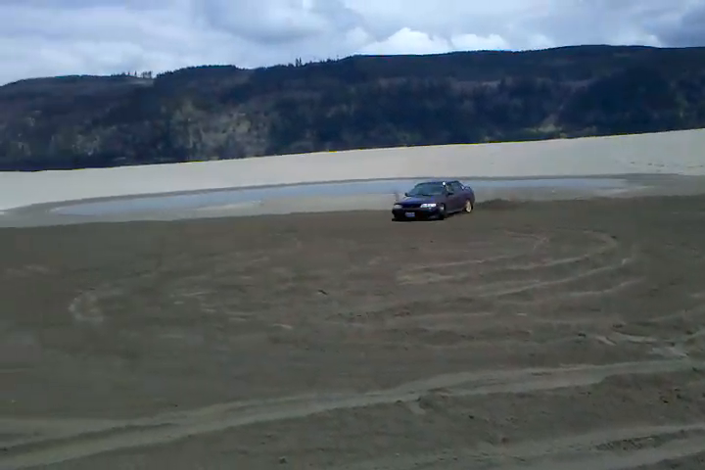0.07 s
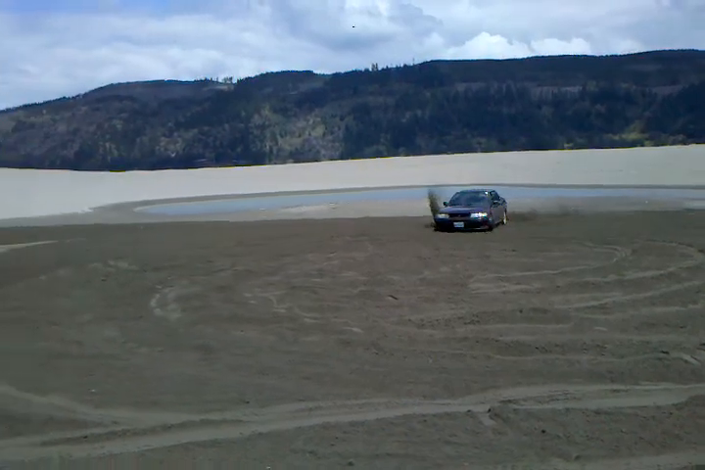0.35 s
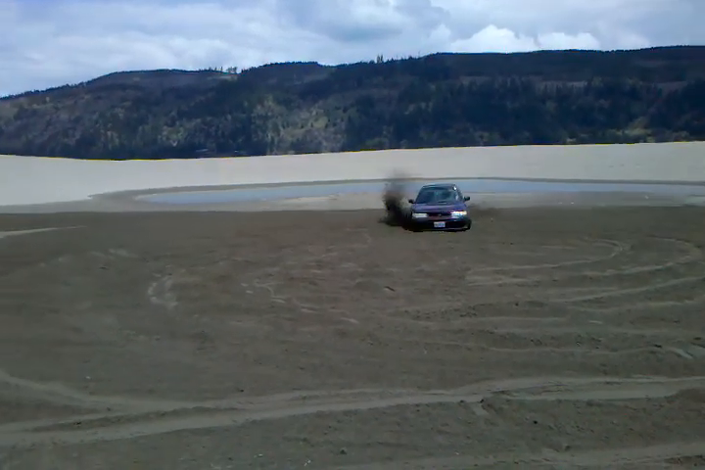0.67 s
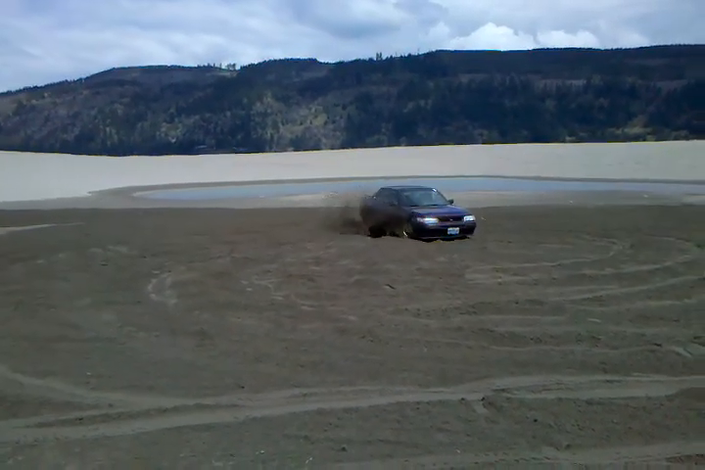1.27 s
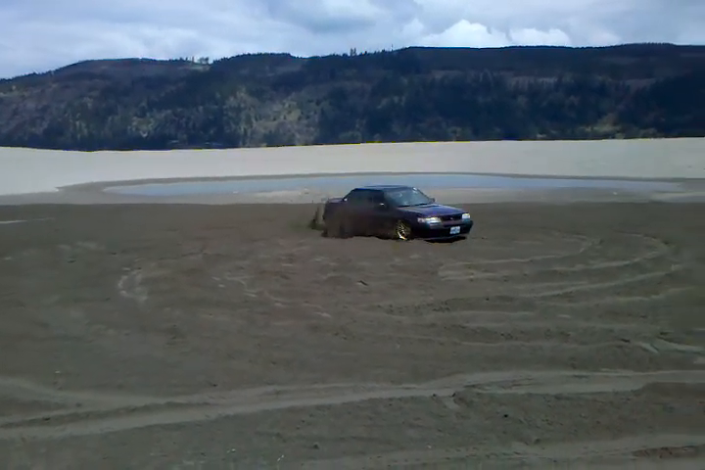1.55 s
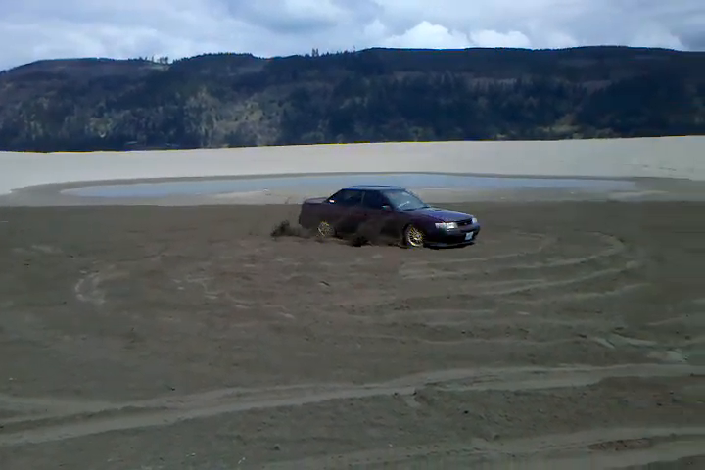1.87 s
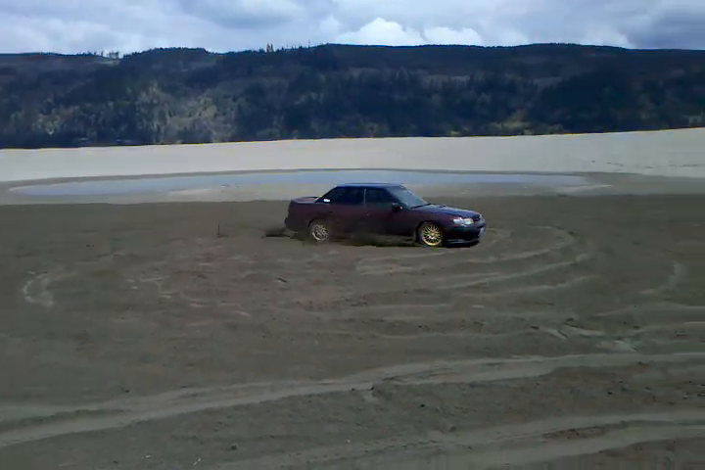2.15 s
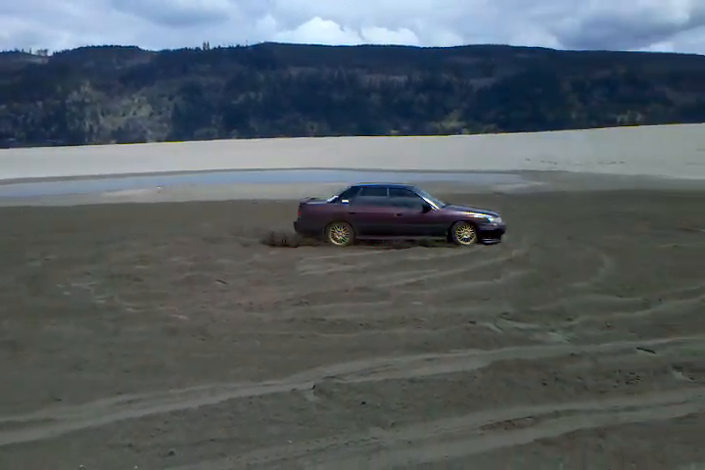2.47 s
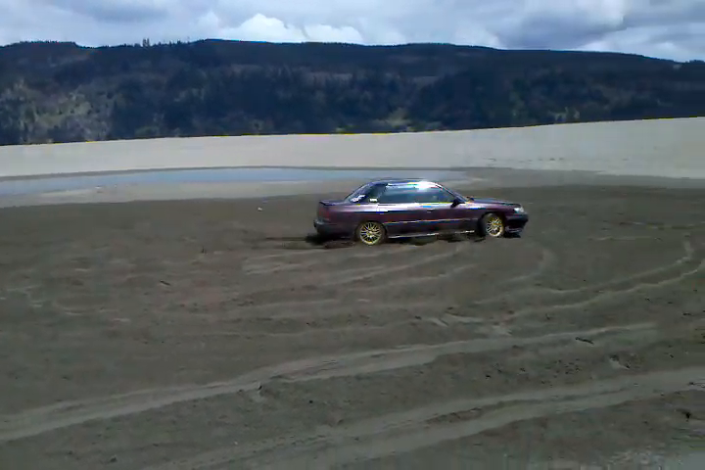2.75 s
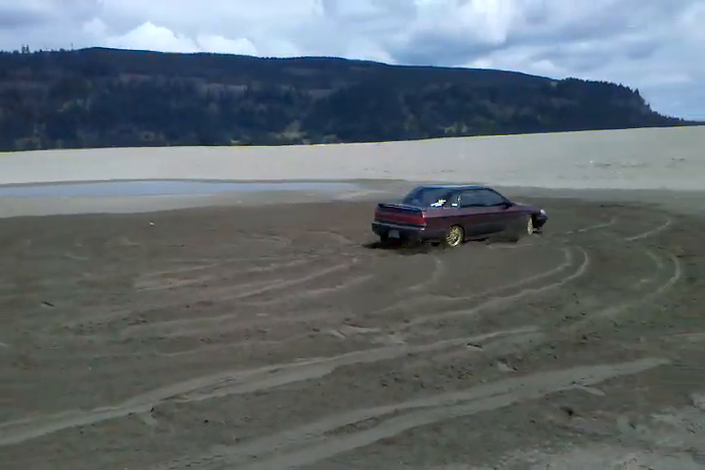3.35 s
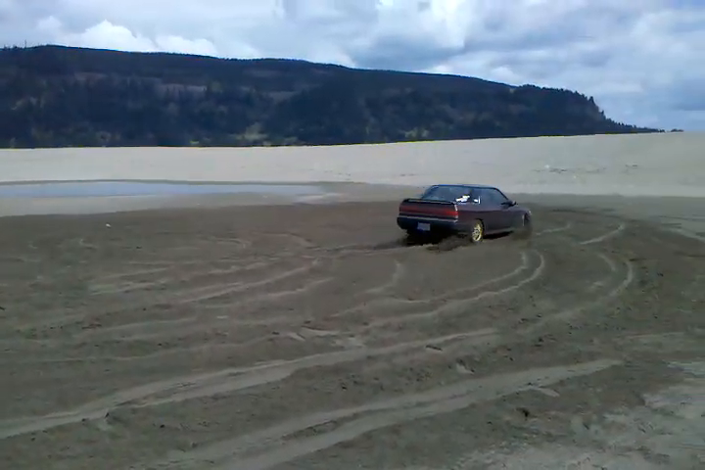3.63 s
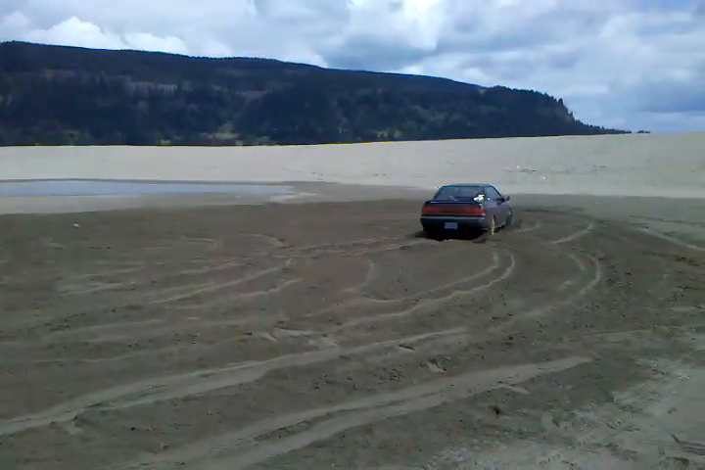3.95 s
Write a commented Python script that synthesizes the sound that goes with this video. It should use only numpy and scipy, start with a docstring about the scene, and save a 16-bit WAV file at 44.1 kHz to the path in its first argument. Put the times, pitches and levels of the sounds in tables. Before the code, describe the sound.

A turbocharged car revs in surges across open ground, tyres throwing sand throughout. The turbo whistles up and vents with hooting hisses as the throttle lifts; then the tailpipe swings toward the stereo microphone, barking and popping as revs fall.

```python
"""A turbocharged flat-four car slides in a circle on loose dirt, some way off in the open.
The tyres spray grit throughout. The turbo whistles up, the driver lifts and the blow-off valve vents.
The revs sag, then the uneven exhaust beat swells with the throttle, broken by a short puff of the valve.
At 2.5 s the tailpipe swings toward a small stereo microphone with a widening circuit and the exhaust barks.
The valve vents again, the bass spreads wide and the exhaust pops on the overrun."""
import sys
import numpy as np
from scipy import signal
from scipy.fft import rfft, irfft, next_fast_len
from scipy.io import wavfile

SR = 44100
rng = np.random.default_rng(int(sys.argv[2]) if len(sys.argv) > 2 else 0)


def unload_audio(sound):
    """Save the sound as a 16-bit wav file, at the path given as the first command line argument."""
    columns = np.transpose(np.atleast_2d(sound))
    # keep every value between -1 and 1, then stretch to whole-number steps
    steps = np.round(np.clip(columns, -1, 1) * 32767)
    wavfile.write(sys.argv[1], SR, steps.astype(np.int16))


N = 176400
T = np.arange(N) / SR
SIZE = next_fast_len(N + SR // 4)
HZ = np.maximum(np.arange(SIZE // 2 + 1) * SR / SIZE, 1)

# accents of the four firings in one engine cycle: level/dB
FIRING_DB = [-4.5, -12, -6.5, -2]
# colour of rushing gas, in the valve and the pops: f/Hz, level/dB
GAS_RUSH_EQ = [(500,-80),(800,10),(1150,11.5),(1400,-3),(1700,12),(2600,-5),(3400,-12.5),(6000,-32.5)]


def exhaust_tone(speed, cycles):
    """The engine's low orders swell and fade as they slide through the pipe's resonances."""
    orders = [(4,-5.5),(5,-1),(6,-23.5),(7,4.5),(8,1.5),(9,1),(11,-0.5)]  # balance of the orders: multiple of the cycle rate, level/dB
    pipe_eq = [(150,-1),(195,3.5),(232,-10),(268,4),(300,-1),(345,1.5),(400,-10),(520,-35),(640,-6)]  # response of the exhaust pipe: f/Hz, level/dB
    fader = [(0,-27.5),(.08,-47),(.18,-31),(.44,-26.5),(.52,-64),(.88,-43),(1.0,-28.5),(1.48,-30),(1.62,-22),(1.85,-22),(2.09,-25.5),(2.16,-35),(2.33,-22),(2.68,-23),(2.86,-44),(3.08,-37.5),(3.42,-26),(3.72,-29.5),(4,-39.5)]  # the tone follows the throttle: t/s, level/dB
    resonance_hz, resonance_width_hz, pipe_delay_s = 279.3, 12, 0.00066
    drone_db, drone_width_hz, waver_db = 8, 26, 2.37
    pipe_hz, pipe_db = np.transpose(pipe_eq)
    wave, power = 0, 0
    for k, db in orders:
        k = round(k)
        hz = k * speed
        if k == 2 * len(FIRING_DB):  # twice the firing rate drones when it meets the resonance
            db = db + drone_db / (1 + ((hz - resonance_hz) / drone_width_hz) ** 8)
        gain = amp(db + np.interp(hz, pipe_hz, pipe_db))
        # the main resonance twists the phase and smears the beat
        twist = 1.32 * np.arctan((hz - resonance_hz) / resonance_width_hz)
        phase = 2 * np.pi * k * (cycles - speed * pipe_delay_s) - twist
        wave = wave + gain * amp(waver_db * drift(3.4)) * np.cos(phase)
        power = power + gain ** 2 / 2
    return envelope(fader) * wave / np.sqrt(power)


def exhaust_pulses(cycles):
    """Two strong and two weak firings a cycle, each a pressure step with a puff of gas."""
    rumble_fader = [(0,-34.5),(1.1,-38.5),(1.7,-32.5),(2.9,-31.5),(3.65,-34),(4,-31)]  # rough low end: t/s, level/dB
    rumble_eq = [(40,-42.5),(70,-22.5),(110,-3),(170,1.5),(480,-7.5),(900,-55)]  # its dull thud: f/Hz, level/dB
    bark_fader = [(0,-43),(.4,-33.5),(.55,-46.5),(1.3,-42),(1.6,-32.5),(2.2,-43.5),(2.58,-24.5),(2.85,-40.5),(3.4,-32),(3.7,-33),(4,-46.5)]  # the tailpipe's bark: t/s, level/dB
    bark_eq = [(200,-41.5),(330,12.5),(410,5),(640,-0.5),(900,-7),(1150,-9.5),(1400,-39),(3000,-63.5)]  # its throaty low mids: f/Hz, level/dB
    crack_fader = [(0,-43),(.9,-56),(1.5,-51.5),(2.42,-57),(2.5,-35.5),(2.66,-36),(2.8,-76),(3.2,-54),(3.35,-39),(3.72,-46.5),(3.87,-56)]  # sharp edge of the firings: t/s, level/dB
    crack_eq = [(80,-34),(400,27),(1150,-42),(1400,-4.5),(1900,12),(3300,-6.5),(5000,-16),(9000,-51)]  # its knock and bite: f/Hz, level/dB
    spread_db, jitter_s, puff_s, ragged_from_s = 2.5, .00007, 0.0026, 2.521
    firings = np.flatnonzero(np.diff(np.floor(len(FIRING_DB) * cycles)))
    level_chance, time_chance = rng.standard_normal((800, 2))[:len(firings)].T
    db = np.resize(np.roll(FIRING_DB, -1), len(firings)) + spread_db * level_chance
    onsets = firings + (jitter_s * SR * time_chance).astype(int)
    clicks = np.zeros(N)
    clicks[np.clip(onsets, 0, N - 1)] = amp(db)
    puffs = unit(dying(clicks, puff_s) * noise())
    pulses = unit(clicks) + 0.55 * puffs
    rumble = envelope(rumble_fader) * colour(pulses + 1.58 * noise(), rumble_eq)
    # the bark turns from clean to ragged going into the overrun
    ragged = 0.63 + np.clip((T - ragged_from_s) / 0.19, 0, 1)
    bark = envelope(bark_fader) * colour(unit(clicks) + ragged * puffs, bark_eq)
    crack = envelope(crack_fader) * colour(pulses, crack_eq)
    return rumble + bark + crack


def exhaust_song(speed, cycles):
    """Under load the upper orders stand out as clean lines, each loudest where it meets a resonance."""
    fader = [(.1,-46),(.42,-44),(.55,-84),(1.6,-50),(2.05,-40),(2.17,-45.5),(2.55,-31.5),(2.7,-36),(2.9,-62)]  # singing upper orders: t/s, level/dB
    resonances = [(415,-3),(510,-0.5),(640,5),(900,3),(1060,-5.5)]  # peaks they slide through: f/Hz, level/dB
    width_hz = 61
    wave, power = 0, 0
    for k in range(11, 33):
        gain = sum(amp(db) / (1 + (2 * (k * speed - hz) / width_hz) ** 2) for hz, db in resonances)
        wave = wave + gain * np.cos(2 * np.pi * (k * cycles + rng.random()))
        power = power + gain ** 2 / 2
    return envelope(fader) * wave / np.sqrt(power)


def overrun_pops():
    """Short bursts of gas in the tailpipe: a thump, some with a hard crack on top."""
    pops = [(2.982,-31,-60),(3.008,-29.5,-56),(3.124,-29,-46),(3.188,-27,-64),(3.234,-22.5,-48),(3.31,-34,-41),(3.349,-35.5,-34.5),(3.389,-30.5,-36.5),(3.694,-26.5,-42)]  # cue list: t/s, thump/dB, crack/dB
    thump_eq = [(50,-49),(200,-2.5),(450,7),(1300,-11),(3500,-55),(9000,-62)]  # body of a pop: f/Hz, level/dB
    clicks = np.zeros((2, N))
    for s, thump_db, crack_db in pops:
        clicks[:, int(s * SR)] += amp([thump_db, crack_db])
    thump, crack = dying(clicks, decay_s=0.0073)
    return thump * colour(noise(), thump_eq) + crack * colour(noise(), GAS_RUSH_EQ)


def blow_off():
    """The valve opens with a hiss; as pressure drains, its hoot steps down the pipe's resonances."""
    # valve openings: t/s, length/s, attack/s, hiss/dB, hiss fade/(dB/s),
    # hoot/dB, hoot f/Hz, hoot and rush fade/(dB/s), rush/dB
    vents = [(-.06,0.13,.015,-29,30,-34,1050,-3,-31),(0.409,0.43,0.058,-25,40,-23.5,1143,28,-31.5),(2.039,.11,0.044,-31.5,-6,-30,1278,34,-37.5),(2.651,0.29,0.097,-32.5,60,-30,1163,68,-37)]
    hiss_eq = [(900,-41.5),(1800,2.5),(2600,6.5),(3400,-7),(4600,2.5),(6000,12),(7200,-6.5),(8400,10),(10000,1.5),(12000,-4.5),(14000,1)]  # bright escaping air: f/Hz, level/dB
    modes = [(830,2),(990,1),(1075,1),(1190,3)]  # resonances of the valve's pipe: f/Hz, level/dB
    release_s, hoot_delay_s, sag_hz_per_s = 0.016, 0.047, 800
    mode_width_hz, jet_width_hz, octave_db, flutter_db = 60, 124, -15, 2.5
    hiss = colour(noise(), hiss_eq)
    rush = colour(noise(), GAS_RUSH_EQ)
    flutter = amp(flutter_db * drift(17))
    tones = []
    for hz, db in modes:
        tone = whistle(hz, mode_width_hz) + amp(octave_db) * whistle(2 * hz, 2 * mode_width_hz)
        tones.append((hz, amp(db) * tone))
    out = 0
    for s, length, attack, hiss_db, hiss_fade, hoot_db, hoot_hz, fade, rush_db in vents:
        age = T - s
        open_s = np.maximum(age - attack, 0)
        jet = amp(hiss_db - hiss_fade * open_s) * hiss + amp(rush_db - fade * open_s) * rush
        jet *= np.clip(age / attack, 0, 1) * flutter ** 0.75
        # the sagging jet excites whichever modes lie nearest
        jet_hz = hoot_hz - sag_hz_per_s * np.clip(age, 0, length)
        hoot = sum(tone / np.hypot(1, 2 * (hz - jet_hz) / jet_width_hz) for hz, tone in tones)
        hoot *= amp(hoot_db - fade * open_s) * flutter / np.sqrt(2)
        hoot *= np.clip((age - hoot_delay_s) / attack, 0, 1)
        closing = np.exp(-np.maximum(age - length, 0) / release_s)
        out = out + closing * (jet + hoot)
    return out


def turbo():
    """The intake roars and the compressor whistles unsteadily as boost builds."""
    intake = [(0,950,-53),(.33,1160,-34.5),(.44,1150,-46),(.6,1000,-104),(1.55,1060,-39.5),(1.85,1140,-36.5),(2.2,1050,-54),(2.42,1100,-29.5),(2.6,1040,-36.5),(2.95,900,-75)]  # roar under boost: t/s, f/Hz, level/dB
    spool = [(.1,11000,-66),(.36,14200,-44),(.5,14000,-65),(.85,5793,-57),(1.08,7280,-72),(1.2,8400,-53.5),(1.6,12360,-54),(1.8,13390,-50.5),(2.06,14400,-43),(2.18,11120,-61.5),(2.41,13530,-49),(2.62,13750,-52.5),(2.78,12990,-64)]  # compressor whistle: t/s, f/Hz, level/dB
    flicker_db, waver_hz = 3, 50
    intake_hz, intake_db = in_time(intake)
    hz, db = in_time(spool)
    compressor = amp(db + flicker_db * drift(22)) * whistle(hz + waver_hz * drift(39), width_hz=560)
    return amp(intake_db) * whistle(intake_hz, width_hz=95) + compressor


def dirt_spray():
    """The tyres throw a wash of sand with grains of grit in it."""
    fader = [(0,-49.5),(.35,-39.5),(.9,-48.5),(1.55,-38),(2.25,-40),(2.85,-39.5),(3.08,-45),(4,-49)]  # surges of dirt: t/s, level/dB
    sand_eq = [(200,-26),(500,8),(1000,13),(1400,0),(1900,3.5),(3600,-13),(5000,-7),(9000,-10),(11500,-17.5),(14000,-14)]  # colour of the spray: f/Hz, level/dB
    grains_per_s, grit_db = 420, -6.5
    grit = (rng.random(N) < grains_per_s / SR) * (2 * rng.random(N) - 1)
    return envelope(fader) * colour(noise() + amp(grit_db) * unit(grit), sand_eq)


def rushing_layers():
    """Turbo, valve and dirt together, from fresh noise at each call."""
    return turbo() + blow_off() + dirt_spray()


def ground_scatter(x, decay_s=0.013):
    """Short diffuse scatter off the ground, with a flat spectrum."""
    response = rfft(noise() * np.exp(-T / decay_s), SIZE)
    return filtered(x, response / (np.abs(response) + 1e-12))


def amp(db):
    """Decibels to gain."""
    return 10 ** (np.asarray(db) / 20)


def unit(x):
    """Scale to rms 1."""
    return x / np.sqrt(np.mean(np.abs(x) ** 2) + 1e-20)


def in_time(rows):
    """Columns of an automation curve at every sample."""
    s, *columns = np.transpose(rows)
    return [np.interp(T, s, c) for c in columns]


def envelope(fader):
    """A fader curve's gain at every sample."""
    return amp(in_time(fader)[0])


def gains(eq):
    """An EQ curve's gain at every frequency."""
    hz, db = np.transpose(eq)
    return amp(np.interp(np.log(HZ), np.log(hz), db))


def filtered(x, response):
    """Apply a frequency response."""
    return irfft(rfft(x, SIZE) * response, SIZE)[..., :N]


def colour(x, eq):
    """Minimum-phase EQ, which keeps attacks sharp; the result has rms 1."""
    cepstrum = irfft(np.log(gains(eq)), SIZE)
    cepstrum[1:SIZE // 2] *= 2
    cepstrum[SIZE // 2 + 1:] = 0
    return unit(filtered(x, np.exp(rfft(cepstrum))))


def noise():
    """White noise."""
    return rng.standard_normal(N)


def drift(rate_hz):
    """Smooth random wander with spread 1, drawn at every 16th sample."""
    s = T[::16]
    hz = np.arange(len(s) // 2 + 1) * SR / N
    spectrum = rfft(rng.standard_normal(len(s))) / np.sqrt(1 + (hz / rate_hz) ** 4)
    return np.interp(T, s, unit(irfft(spectrum, len(s))))


def whistle(hz, width_hz):
    """Turbulence in a narrow resonance with a steady or moving centre."""
    phase = 2 * np.pi * np.cumsum(np.broadcast_to(hz, N)) / SR
    return unit(drift(width_hz / 2) * np.cos(phase) + drift(width_hz / 2) * np.sin(phase))


def dying(clicks, decay_s):
    """Each click starts an exponential decay."""
    return signal.lfilter([1], [1, -np.exp(-1 / (decay_s * SR))], clicks + 1e-18)


def scene():
    """The car ahead of the microphone; its bass spreads wide as the tailpipe comes round."""
    revs = [(0,38.77),(.15,42.52),(.29,41.69),(.43,43.29),(.6,33.24),(.9,23.02),(1.2,26.81),(1.38,28.17),(1.58,32.85),(1.71,32.43),(1.8,34.8),(1.92,38.84),(2.02,39.08),(2.22,37.73),(2.448,35.36),(2.53,37.49),(2.686,39.33),(2.75,38.3),(2.87,30.7),(3.05,23.01),(3.2,22.62),(3.3,24.88),(3.5,27.65),(3.75,27),(4,23.97)]  # rate of engine cycles, four firings each: t/s, f/Hz
    width_fader = [(.5,-6.5),(1.8,-12),(2.7,-10),(3.2,0.5)]  # exhaust in the side signal as the car turns: t/s, level/dB
    width_eq = [(40,-24),(100,-10.5),(180,3.5),(300,-1),(550,0.5),(900,-10.5),(5000,5)]  # colour of that spread: f/Hz, level/dB
    diffuse_eq = [(60,29),(140,-5.5),(280,-25),(500,-26),(900,-15.5),(2400,1.5),(9000,-0.5)]  # diffuse side signal: f/Hz, level/dB
    speed, = in_time(revs)
    cycles = np.cumsum(speed * (1 + .004 * drift(12))) / SR
    exhaust = exhaust_tone(speed, cycles)
    exhaust += exhaust_song(speed, cycles) + exhaust_song(speed, cycles)  # doubled, with new phases
    exhaust += exhaust_pulses(cycles) + overrun_pops()
    mid = exhaust + rushing_layers()
    spread = envelope(width_fader) * filtered(exhaust, -1j * gains(width_eq))  # 90 degrees behind
    diffuse = filtered(ground_scatter(exhaust) + rushing_layers(), gains(diffuse_eq))
    side = spread + diffuse
    return np.array([mid + side, mid - side])


def record(dry):
    """Each channel's treble is delayed and subtracted from the other for width; the top is cut."""
    balance_eq = [(300,-1),(1900,0.5),(2400,10.5),(2950,4),(3500,13),(4300,-1.5),(14000,0)]  # left over right: f/Hz, level/dB
    widen_above_hz, widen_below_hz, delay_s, cutoff_hz = 1700, 6000, .00034, 14100
    share = .95 / (1 + (widen_above_hz / HZ) ** 6) / np.sqrt(1 + (HZ / widen_below_hz) ** 4)
    trim = 1 / np.sqrt(1 + share ** 2)
    crossfeed = filtered(dry[::-1], share * trim * np.exp(-2j * np.pi * HZ * delay_s))
    wide = filtered(dry, trim) - crossfeed
    tilt = np.sqrt(gains(balance_eq))
    low_pass = 1 / np.sqrt(1 + (HZ / cutoff_hz) ** 240)
    return filtered(wide, np.array([tilt, 1 / tilt]) * low_pass)


dry = scene()
out = record(dry)
unload_audio(out)
```